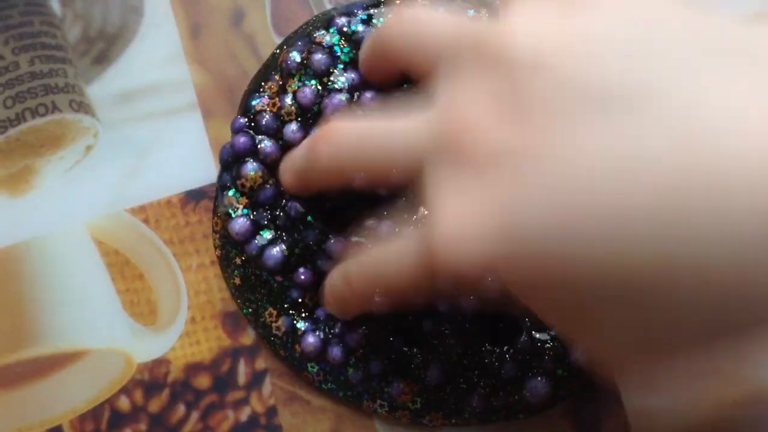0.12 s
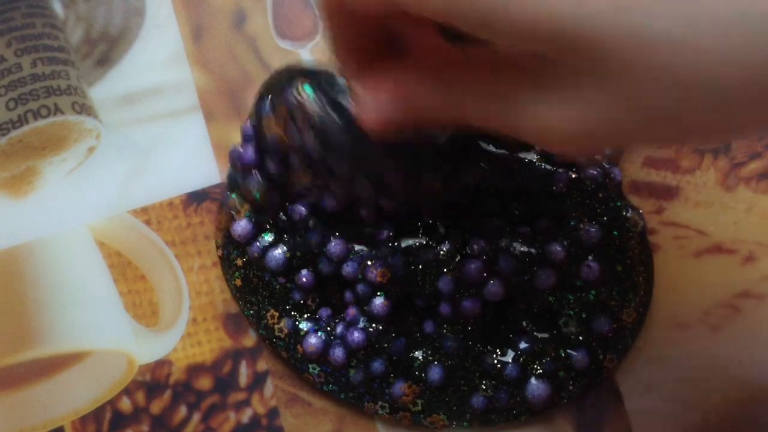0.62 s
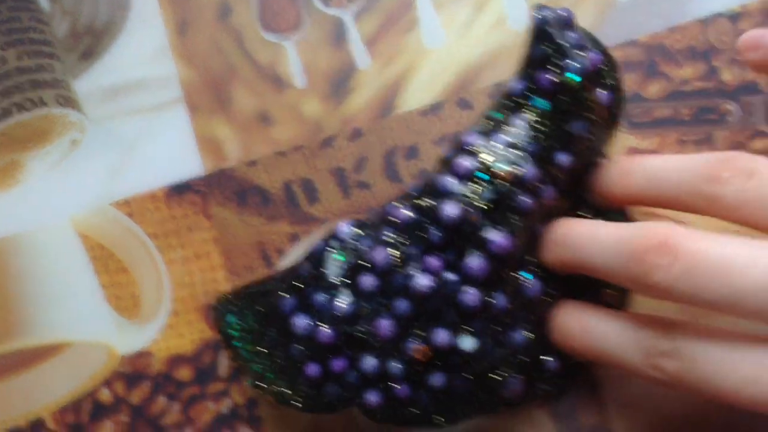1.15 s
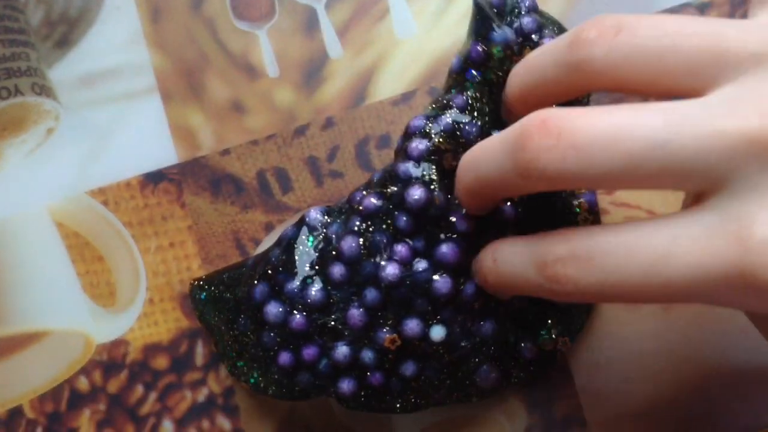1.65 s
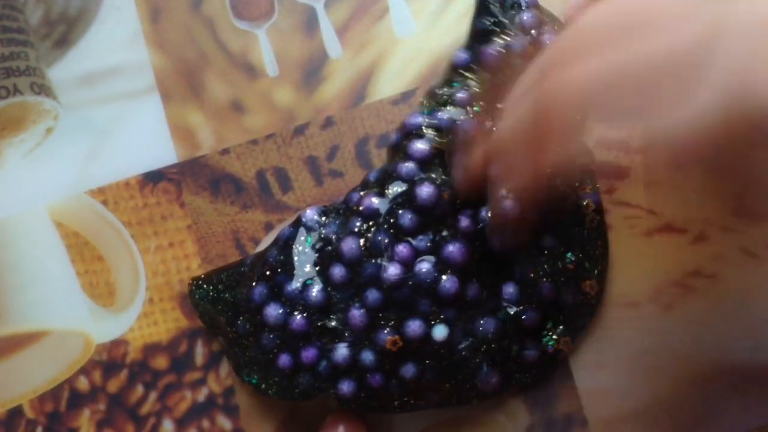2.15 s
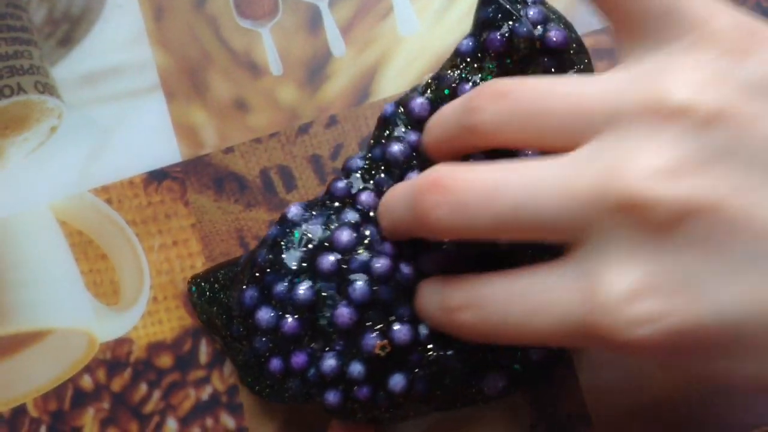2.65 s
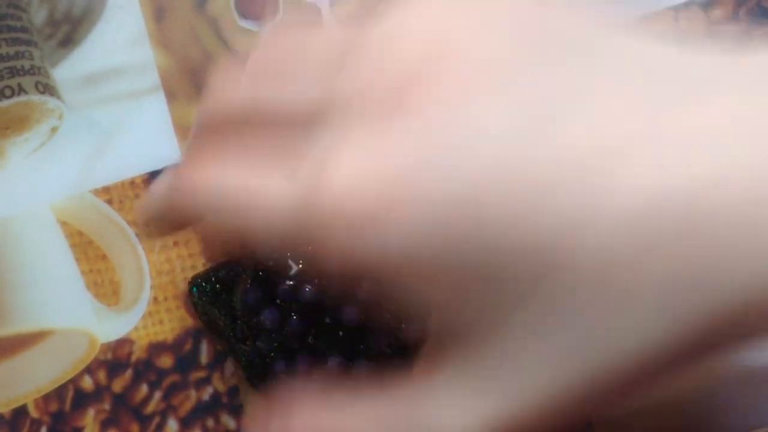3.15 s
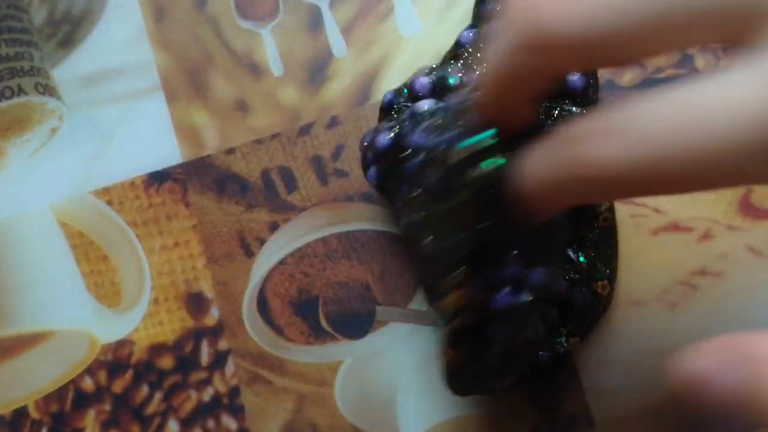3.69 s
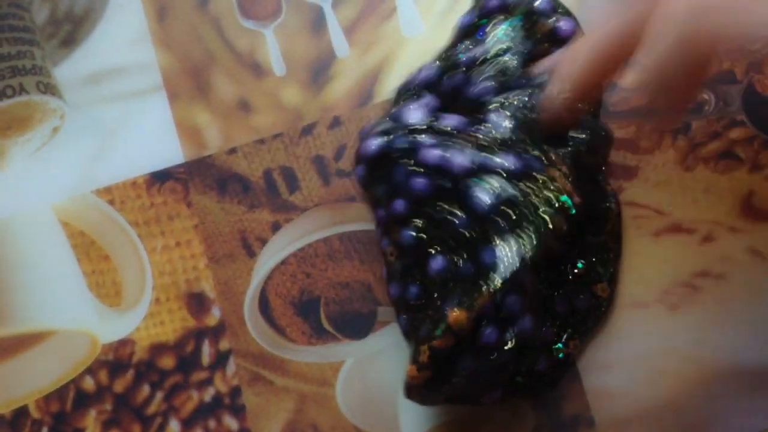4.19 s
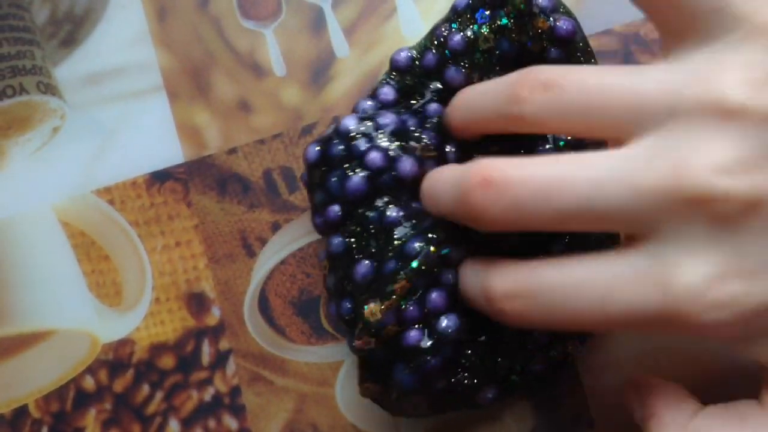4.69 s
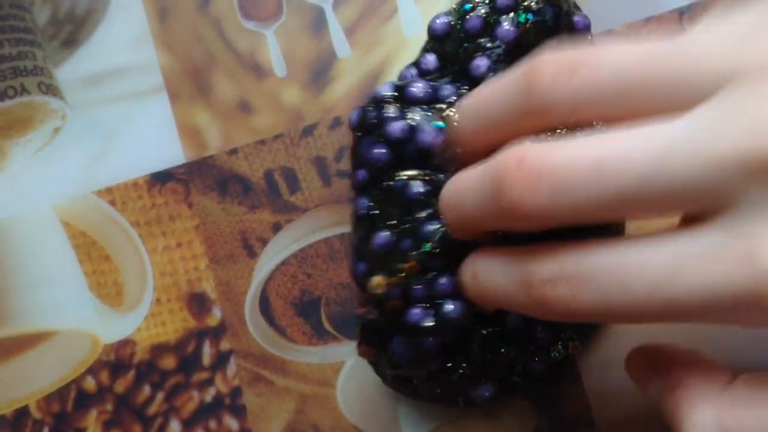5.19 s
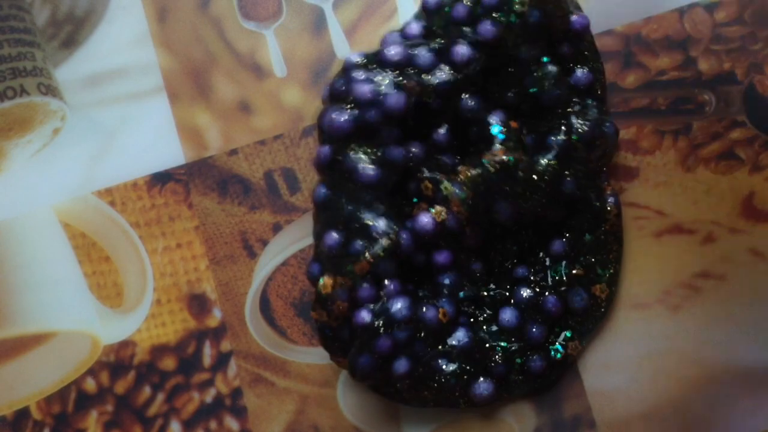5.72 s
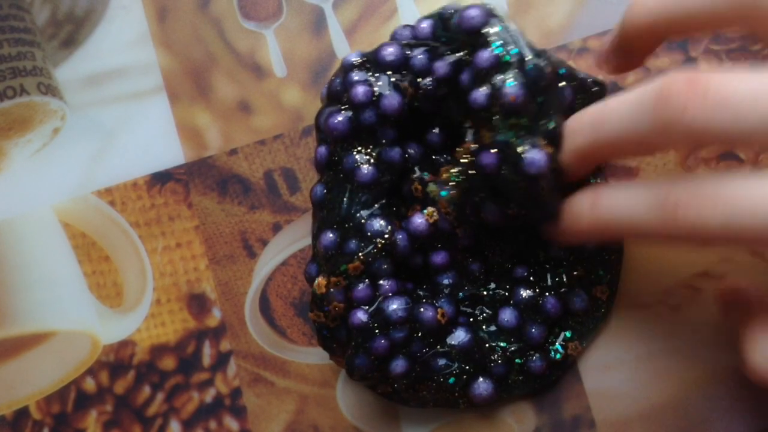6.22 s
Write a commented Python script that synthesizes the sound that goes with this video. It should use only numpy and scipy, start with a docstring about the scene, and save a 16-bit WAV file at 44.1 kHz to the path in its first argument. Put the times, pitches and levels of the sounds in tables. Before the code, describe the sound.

Sticky slime full of little beads crackles under fingers. Crisp, bright film snaps, tiny hollow pops and moist squelches come irregularly, separated by near-quiet gaps. After an early peel and rip, three strong bursts stand out, the loudest snaps harsh and slightly overloaded, before lighter clicks finish. Close, dry miking in a small room with short reflections, steady low hum, soft rumble and hiss.

```python
"""Fingers poke and pull a lump of bead-filled slime on a table, heard close up in a small quiet room.
First come light film snaps, small hollow pops and squelches; near 1.1 s a peel hiss swells into a rip and a pop.
The densest, loudest bursts of snaps, rips and ringing pops fall near 2.2, 2.9 and 4.8 s, with lighter pokes
between and after. Films are noise puffs, pockets rising sines with breath, squelches and peel filtered clicks;
faint ticking, appliance hum, rumble and hiss lie below throughout."""
import sys
import numpy as np
from scipy import signal
from scipy.fft import rfft, irfft
from scipy.io import wavfile

SR = 44100
rng = np.random.default_rng(int(sys.argv[2]) if len(sys.argv) > 2 else 0)


def gain_from_db(level_db):
    """Turn a decibel level (scalar or array-like) into a linear amplitude factor."""
    decades = np.asarray(level_db, float) / 20
    return 10 ** decades


def wav_record(signal):
    """Record a signal, one row per channel, as 16-bit PCM in the file named by sys.argv[1]."""
    frames = np.transpose(np.atleast_2d(signal))
    bounded = np.clip(frames, -1, 1)
    # unit amplitude maps onto the largest positive 16-bit level
    quanta = np.round(bounded * 32767).astype(np.int16)
    wavfile.write(sys.argv[1], SR, quanta)


N = 279594   # samples


def rms_one(x):
    """Scale to rms 1."""
    return x / np.sqrt(np.mean(x ** 2) + 1e-20)


def band(x, low_hz, high_hz):
    """Butterworth band-pass with its edges held inside the usable range."""
    edges = np.clip([low_hz, high_hz], [20, 40], [.4 * SR, .45 * SR])
    return signal.sosfilt(signal.butter(2, edges, "band", fs=SR, output="sos"), x)


def low_pass(x, cut_hz):
    """One-pole low-pass that dulls a sound gently."""
    pole = np.exp(-2 * np.pi * cut_hz / SR)
    return signal.lfilter([1 - pole], [1, -pole], x)


def drift(rate_hz):
    """Slow random wander of spread 1: noise through two equal poles, computed every 40 samples."""
    hop = 40
    pole = np.exp(-2 * np.pi * rate_hz * hop / SR)
    noise = rng.standard_normal(N // hop + 2002)
    slow = signal.lfilter([1], [1, -2 * pole, pole * pole], noise)[2000:]   # drop the filter's run-in
    return np.interp(np.arange(N) / hop, np.arange(len(slow)), rms_one(slow))


def at_hz(points, hz):
    """Read a (Hz, value) table on a log-frequency axis."""
    table_hz, value = np.transpose(points)
    return np.interp(np.log(hz), np.log(table_hz), value)


def add(out, start_s, sound, peak_db):
    """Lay a sound of given peak level into the track."""
    i = round(start_s * SR)
    sound = sound[:N - i]
    out[i:i + len(sound)] += gain_from_db(peak_db) * sound / np.abs(sound).max()


def grains(per_s, spread_db):
    """Random clicks of either sign, most small, a few large."""
    size_db = spread_db * np.minimum(rng.exponential(1, N), 4)
    sizes = gain_from_db(size_db) * rng.choice([-1, 1], N)
    return sizes * (rng.random(N) < per_s / SR) + 1e-18


def snaps():
    """A tearing film gives a sharp puff of air and a short spit, coloured by the size of the gap."""
    # single films snapping between the beads: (time [s], relative level [dB], centre [Hz])
    single_films = [(0.0325, -33, 11300), (0.0653, -27, 12800), (0.1487, -18, 11600), (0.1527, -15, 8900),
                    (0.168, -36, 7000), (0.1762, -32, 9000), (0.181, -14, 9400), (0.1888, -22, 5200),
                    (0.2084, -5, 13600), (0.2106, -20, 12300), (0.384, -26, 10200), (0.3925, -23, 3870),
                    (0.4216, -25, 7600), (0.5093, -27, 7060), (0.5323, -33, 10400), (0.6025, -33.5, 5000),
                    (0.6242, -25, 9950), (0.632, -33, 5500), (0.6716, -23.5, 9800), (1.206, -39, 12600),
                    (1.262, -29, 12000), (1.2898, -18, 11500), (1.3367, -32, 6900), (2.0269, -26, 8360),
                    (2.1557, -5, 9500), (2.1591, 0.5, 8140), (2.186, -8.5, 9400), (2.6152, -23, 9000),
                    (2.7365, -29.5, 3270), (2.7533, -33, 3900), (2.8372, -36, 9900), (2.8607, -17, 4020),
                    (2.864, -3, 12200), (2.8711, 3, 8300), (2.8814, 5, 9700), (2.9112, -9, 9235),
                    (2.9208, 0.5, 13500), (3.2368, -19, 7650), (3.3017, -20, 5260), (3.444, -32, 8500),
                    (3.508, -19.5, 8000), (3.5265, -25, 4300), (3.5582, -39, 3800), (3.641, -38, 12500),
                    (3.8317, -38, 11700), (3.894, -36, 9000), (3.9364, -33, 11000), (4.0018, -31.5, 9500),
                    (4.0722, -29, 6900), (4.1486, -29, 9400), (4.1588, -24, 8600), (4.187, -11, 11000),
                    (4.2061, -12, 10200), (4.3053, -34.5, 6200), (4.5243, -31, 12300),
                    (4.6576, -22.5, 7760), (4.6801, -7, 12500), (4.7226, -17.5, 7100),
                    (4.8001, -19.5, 11300), (4.812, -9, 11300), (4.8182, 4.5, 10500), (4.8334, -2, 4480),
                    (4.8448, -15, 9000), (4.8563, -13.5, 12000), (4.9123, -23, 10300), (5.3566, -31, 6900),
                    (5.4178, -29.5, 10700), (5.583, -16, 6000), (5.5954, -12, 7980), (5.644, -25, 2900),
                    (5.6667, -25, 12300), (5.7519, -10.5, 10800), (6.0014, -27.5, 8100),
                    (6.0803, -30, 10500), (6.0982, -23, 12800), (6.2346, -29, 12300)]
    # bandwidth of a film's gap, narrowest for the brightest: (centre [Hz], width [share of centre])
    gap_width = [(4000, 0.2), (8000, 0.48), (12500, 0.11)]
    decay_s, spit_s, spit_db, lift_db = 0.00016, 0.0034, -15, 5
    out, t = np.zeros(N), np.arange(600) / SR
    films = single_films + rips()
    air_noise = rng.standard_normal((200, len(t)))
    for (s, db, hz), noise in zip(films, air_noise):
        puff = noise * (np.exp(-t / decay_s) + gain_from_db(spit_db) * np.exp(-t / spit_s))
        spread = np.exp(1.505 * at_hz(gap_width, hz))
        puff = band(puff, hz / spread ** 1.04, hz * spread ** 1.29)
        add(out, s, puff, db + lift_db)
    return out


def rips():
    """Along a seam the films give way at a nearly even pace, each a little different in strength and pitch."""
    # seams unzipping: (start [s], length [s], first relative level [dB], last relative level [dB], centre [Hz])
    seams = [(0.24, 0.0063, -38, -29, 11600), (1.2921, 0.012, -10, 1, 11300),
             (2.2195, 0.012, -4, -18, 8600), (2.8773, 0.0064, -7, -20, 7000),
             (2.915, .021, -1.5, -20, 7730), (4.1707, .015, -9, -11, 5830), (4.827, 0.021, -26, -18, 6800),
             (5.607, 0.017, -20, -36, 9800)]
    gap_s, gap_jitter = .0023, .15   # jitter as share of the gap
    spread_db, pitch_spread = 1.5, 0.067   # pitch spread in natural-log units
    films = []
    chance = rng.standard_normal((len(seams), 3, 14))
    for (s, length, first_db, last_db, hz), (late, strong, high) in zip(seams, chance):
        after = gap_s * (np.arange(len(late)) + gap_jitter * late)
        db = first_db + (last_db - first_db) * after / length + spread_db * strong
        film_hz = hz * np.exp(pitch_spread * high)
        films += list(np.transpose([s + after, db, film_hz])[after < length])
    return films


def pops():
    """A pocket rings a few cycles, rising in pitch as its mouth widens, with rushing air on top."""
    # air pockets popping open: (time [s], relative level [dB], starting pitch [Hz])
    pockets = [(0.0938, -40.5, 930), (0.1533, -29, 840), (0.1812, -33.5, 754), (0.2085, -33, 780),
               (0.3851, -25, 270), (0.3924, -20, 293), (0.4, -21, 1030), (0.6243, -40, 900),
               (1.309, -16, 1465), (2.15, -40, 950), (2.1579, -9, 900), (2.1756, -25.5, 550),
               (2.2201, -7.5, 1424), (2.7354, -25.5, 708), (2.7522, -26.5, 1070), (2.8729, -18, 950),
               (2.881, -20, 980), (2.8891, -25, 1370), (2.9147, -6, 1390), (2.9538, -26, 990),
               (3.2244, -29.5, 700), (3.238, -26, 787), (3.2868, -24, 804), (3.318, -29, 774),
               (3.5033, -34.5, 940), (3.8748, -36, 700), (4.1722, -16.5, 865), (4.1815, -14.5, 877),
               (4.1924, -24, 727), (4.2259, -30, 595), (4.6438, -38, 940), (4.7237, -18, 947),
               (4.8178, -14, 1590), (4.833, -17, 984), (4.853, -20.5, 1880), (4.8782, -23.5, 1510),
               (5.5831, -28, 1410), (5.596, -21, 3210), (5.61, -31, 1030), (5.751, -24, 925),
               (5.8728, -35, 657), (6.0634, -39.5, 436)]
    base_cycles, rise, breath, lift_db = 3.66, 0.033, 0.91, 3
    out, t = np.zeros(N), np.arange(1800) / SR
    air_noise = rng.standard_normal((len(pockets), len(t)))
    for (s, db, hz), noise in zip(pockets, air_noise):
        turns = hz * t   # cycles at the starting pitch
        ring = np.sin(2 * np.pi * turns * (1 + rise * turns / base_cycles))
        rush = rms_one(band(noise, hz / 2.2, hz * 1.5))
        attack = 1 - np.exp(-turns / 0.043)
        decay = gain_from_db(-60 * turns / (base_cycles + hz * 0.027))   # high pockets ring for more cycles
        add(out, s, (ring + breath * rush) * attack * decay, db + lift_db)
    return out


def squelches():
    """Tiny ruptures swell and fade in clumps; each gap size rings in its own band, small high gaps a little later."""
    # slime stretching and sucking:
    # (start [s], length [s], relative level [dB], centre [Hz], width [share of centre])
    strokes = [(0.147, 0.13, -42, 5600, 0.68), (0.381, 0.054, -34.5, 230, 0.86),
               (0.39, 0.04, -33, 966, 0.13), (0.407, 0.049, -30, 3570, 1.16), (0.474, 0.12, -47, 5960, 2.5),
               (0.581, 0.13, -44, 5060, 1.46), (0.705, 0.063, -46, 4170, 1.5),
               (0.849, 0.075, -47.5, 705, .14), (0.915, 0.16, -50.5, 3500, 1.03),
               (0.975, 0.064, -49, 10100, .45), (1.131, 0.24, -44.5, 936, 0.22),
               (1.191, 0.081, -45, 264, 0.28), (1.291, 0.016, -25.5, 2520, .8),
               (1.307, 0.0053, -4, 7000, 0.73), (1.674, 0.041, -44, 7900, 1), (1.832, .08, -48, 715, 0.31),
               (1.842, 0.064, -49.5, 3000, 1.04), (2.216, 0.0085, -15, 3770, 1.6),
               (2.606, 0.078, -49.5, 9000, 2.2), (2.747, 0.03, -42, 280, 0.31),
               (2.872, 0.0028, -6.5, 6200, 0.95), (2.876, 0.098, -36.5, 460, 0.74),
               (2.88, 0.0036, -4, 8040, 1.1), (2.911, 0.017, -16, 3380, 0.39),
               (3.221, 0.039, -35.5, 238, 0.28), (3.278, 0.052, -41, 232, 0.27),
               (3.285, 0.04, -27.5, 4300, 0.6), (3.287, 0.032, -35, 12100, 0.3),
               (3.323, 0.12, -52.5, 780, 0.32), (3.341, 0.067, -45.5, 235, 0.21),
               (3.478, 0.074, -41.5, 3020, 1.9), (3.522, 0.042, -41, 3200, 0.19),
               (3.582, 0.068, -48, 9100, 0.83), (3.854, 0.058, -48.5, 743, 0.11),
               (3.858, 0.046, -51.5, 1890, .6), (4.115, 0.15, -41.5, 6840, 0.92),
               (4.162, 0.035, -24, 2600, 0.74), (4.173, 0.028, -28.5, 288, 0.24),
               (4.637, 0.054, -49.5, 2500, 1.3), (4.72, 0.052, -40, 484, .33),
               (4.815, 0.059, -38.5, 285, 0.33), (4.8173, 0.003, -3, 6900, 1.12),
               (5.301, 0.23, -48.5, 4020, 3.2), (5.554, .13, -37.5, 4120, 1.47),
               (5.58, 0.025, -42, 260, 0.18), (5.742, 0.024, -39, 273, 0.26),
               (5.746, .012, -33.5, 3920, 1.8), (5.864, 0.07, -50, 713, 0.25),
               (5.868, 0.045, -53, 1900, 0.43), (5.921, 0.045, -48.5, 11100, 0.42),
               (6.046, 0.11, -45.5, 6900, 1.12)]
    swell, lag = 0.44, 0.023   # place of the crest and its delay per band, as shares of the length
    out = np.zeros(N)
    ruptures = grains(2200, spread_db=4.0) * gain_from_db(4.0 * drift(80))
    for s, length, db, hz, width in strokes:
        i, n = round(s * SR), round(length * SR)
        done, step, rung = np.linspace(0, 1, n), np.exp(.5 * width), 0
        # five neighbouring bands, each from its own stretch of ruptures, softer away from the centre
        for k, start in enumerate(rng.integers(0, N - SR, 5)):
            crest = np.clip(swell + lag * k, .1, .9)
            stroke = np.sin(np.pi * done ** (np.log(.5) / np.log(crest)))
            gap_hz = hz * step ** (k - 2)
            burst = np.pad(stroke * ruptures[start:start + n], (0, 900))   # room to ring out
            ringing = rms_one(band(burst, gap_hz / step ** 0.59, gap_hz * step ** 0.8))
            rung = rung + ringing * gain_from_db(-1.5 * (k - 2) ** 2)
        out[i:i + len(rung)] += gain_from_db(db) * rms_one(rung) * np.sqrt(.5 * n / len(rung))
    return out


def peel():
    """Fine ruptures along the underside swell into a broad, dull hiss until the lump lets go."""
    # loudness of the lump peeling off the table, near silent outside it: (time [s], level [dB])
    swell = [(1.08, -58), (1.234, -37.5), (1.27, -35.5), (1.284, -40)]
    s, db = np.transpose(swell)
    hiss = low_pass(band(grains(3000, spread_db=1.5), 550, 13000), 910)
    level_db = np.interp(np.arange(N) / SR, s, db, -120, -120) + 1.5 * drift(30)
    return gain_from_db(level_db) * rms_one(hiss)


def settling():
    """The resting slime keeps ticking faintly as stray bubbles burst."""
    ticks = rms_one(band(grains(300, spread_db=6.5), 2600, 19000))
    return gain_from_db(-65.5 + 3.4 * drift(3)) * ticks


def room(x):
    """Dense reflections from table and walls, duller than the direct sound, dying evenly."""
    t60_s, level_db, wall_cut_hz = 0.2, -6, 6700
    t = np.arange(int(.4 * SR)) / SR
    tail = rng.standard_normal(len(t)) * gain_from_db(-60 * t / t60_s) * (1 - np.exp(-t / 0.00011))
    tail = low_pass(tail / np.sqrt(np.sum(tail ** 2)), wall_cut_hz)
    return gain_from_db(level_db) * signal.fftconvolve(x, tail)[:N]


def hum():
    """Steady sine lines from an appliance, wavering slightly in level."""
    # hum lines: (frequency [Hz], mean peak level [dB])
    lines = [(100.0, -47), (127.0, -54), (173.0, -60), (200.0, -44.5), (300.0, -58.5)]
    t = np.arange(N) / SR
    out = np.zeros(N)
    for hz, db in lines:
        out += gain_from_db(db + .6 * drift(3)) * np.sin(2 * np.pi * (hz * t + rng.random()))
    return out


def air():
    """Room rumble and microphone hiss, drifting a little; the lowest octaves come in slow lumps."""
    # colour of the background noise: (frequency [Hz], relative density [dB])
    colour = [(20, -38), (43, -20), (80, -10), (110, -5), (152, -8.5), (253, -5), (349, -10.5), (700, -16),
              (1450, -19), (4000, -22), (12500, -21.5), (15500, -22.5)]
    f = np.arange(N // 2 + 1) * SR / N + 1   # 1 Hz offset keeps the log finite
    hiss = rms_one(irfft(rfft(rng.standard_normal(N)) * gain_from_db(at_hz(colour, f)), N))
    rumble = rms_one(band(rng.standard_normal(N), 25, 70))
    lumps = gain_from_db(-84.5 + 6.5 * drift(2.3)) * rumble
    return gain_from_db(-50 + 1.03 * drift(5.1)) * hiss + lumps


def scene():
    """Slime with its reflections over hum and air; so small a source radiates no deep bass."""
    slime = snaps() + pops() + squelches() + peel() + settling()
    slime = signal.sosfilt(signal.butter(3, 87, "high", fs=SR, output="sos"), slime)
    return (slime + room(slime) + hum() + air())[None]


def band_limit(x):
    """A steep low-pass at the top of the band."""
    return signal.sosfilt(signal.butter(12, 16390, fs=SR, output="sos"), x)


def record(dry):
    """A steep low-pass cuts the top, then the loudest snaps overload and clip at full scale."""
    top_cut = signal.cheby2(12, 60, 16300, fs=SR, output="sos")   # 60 dB down from 16300 Hz upward
    return band_limit(np.clip(signal.sosfilt(top_cut, dry), -1, 1))


dry = scene()
out = record(dry)
wav_record(out)
```